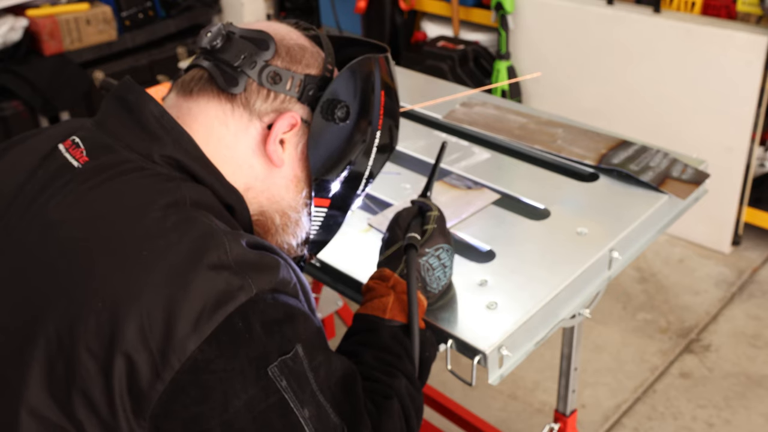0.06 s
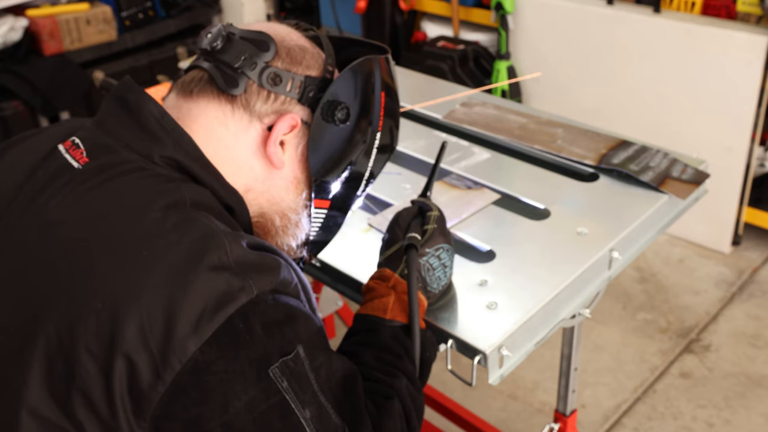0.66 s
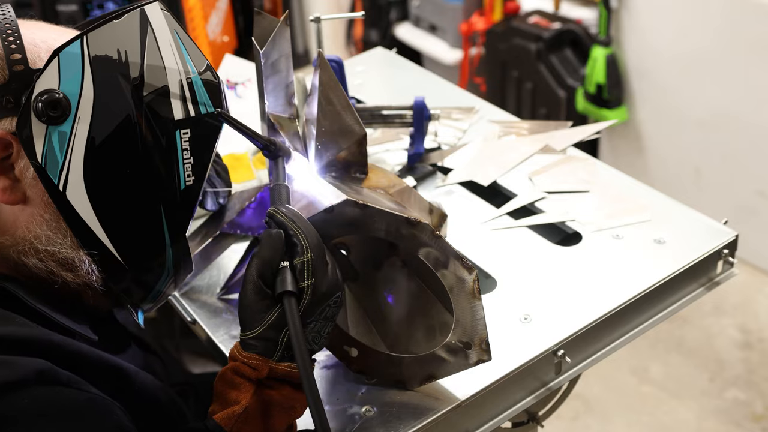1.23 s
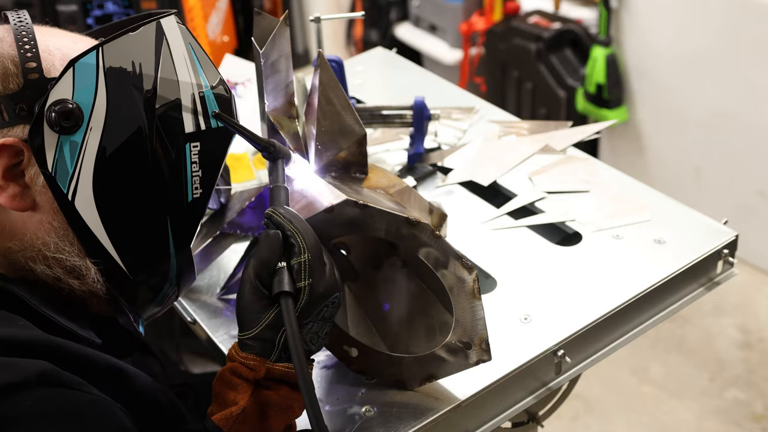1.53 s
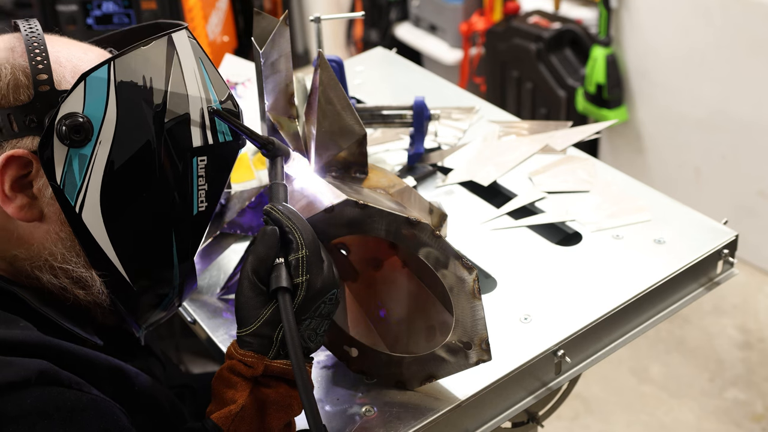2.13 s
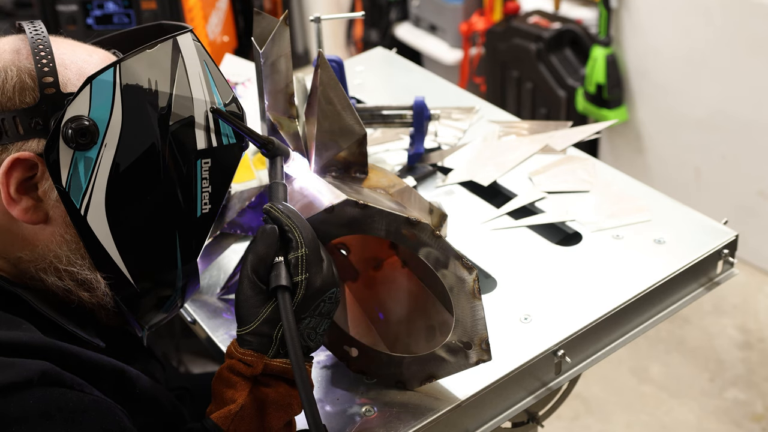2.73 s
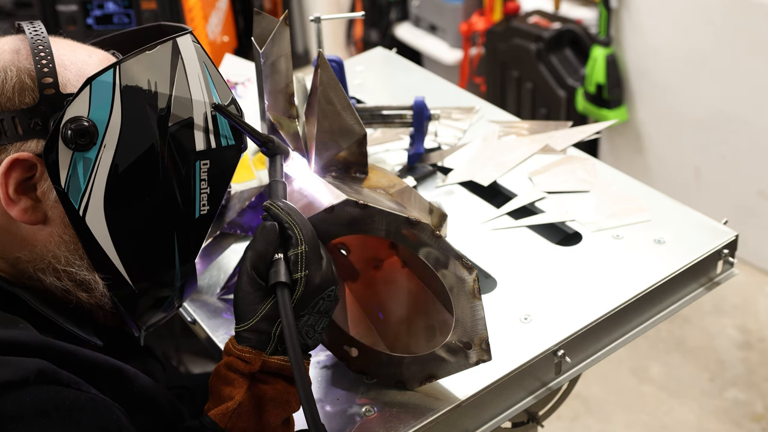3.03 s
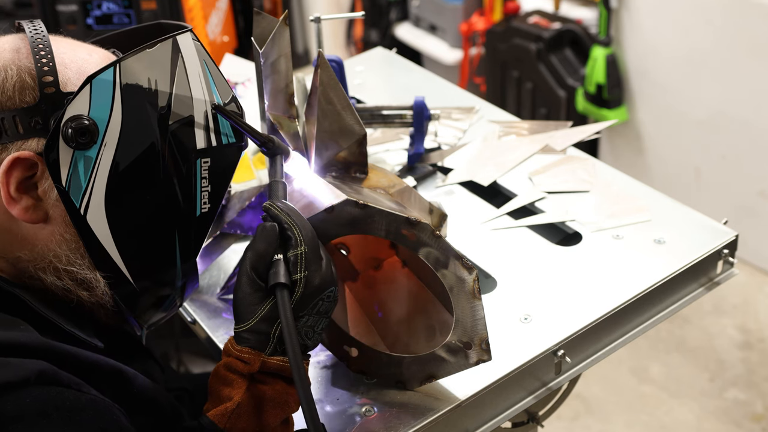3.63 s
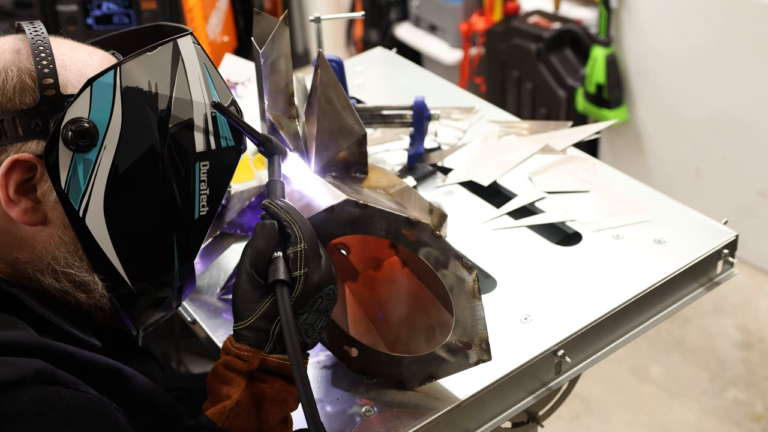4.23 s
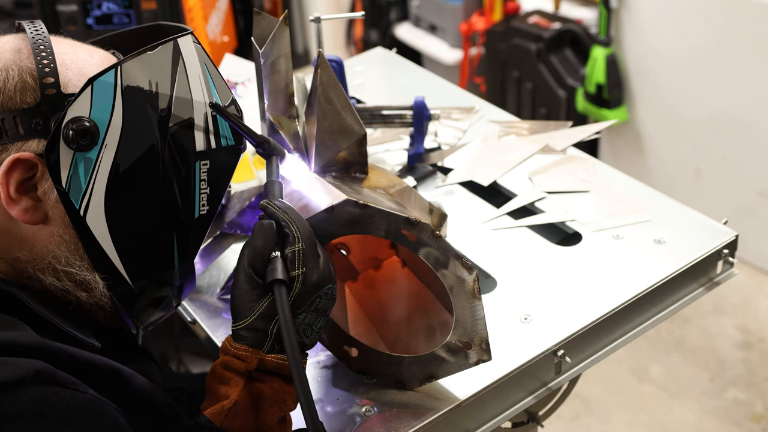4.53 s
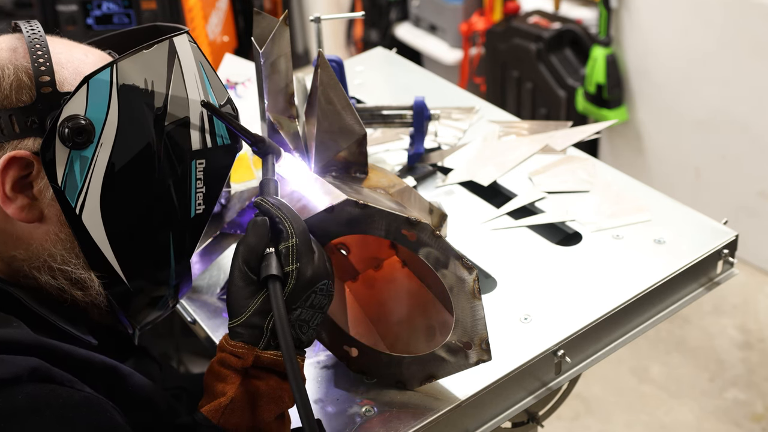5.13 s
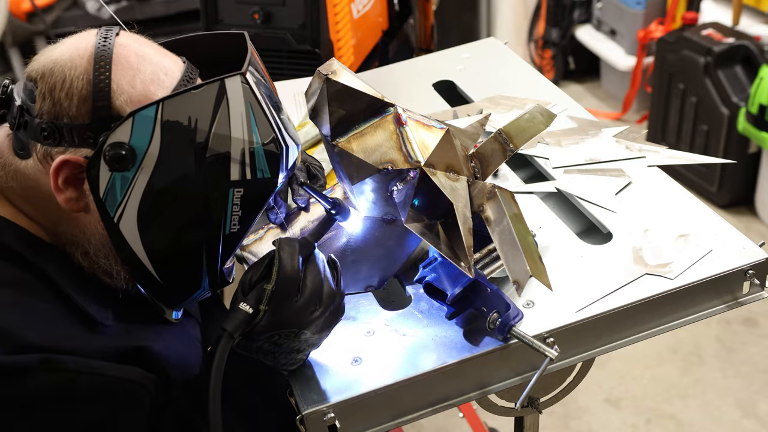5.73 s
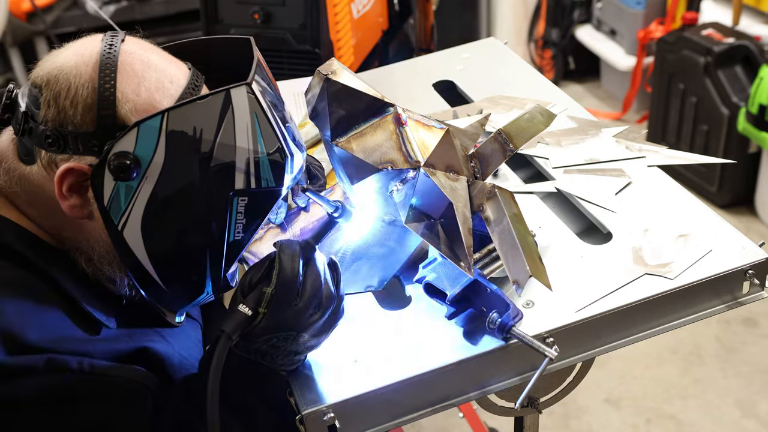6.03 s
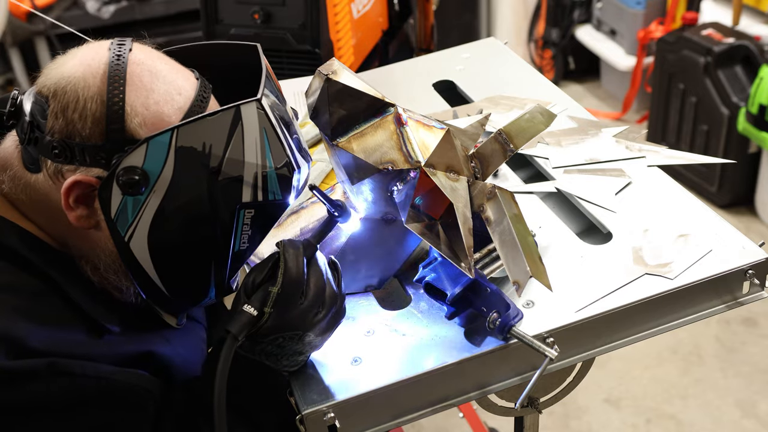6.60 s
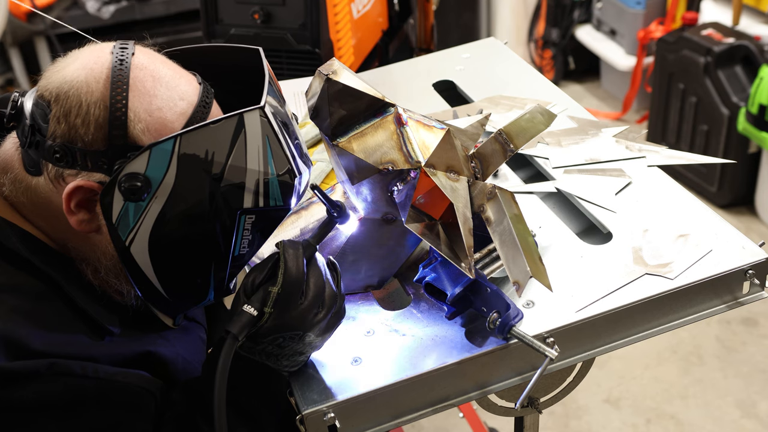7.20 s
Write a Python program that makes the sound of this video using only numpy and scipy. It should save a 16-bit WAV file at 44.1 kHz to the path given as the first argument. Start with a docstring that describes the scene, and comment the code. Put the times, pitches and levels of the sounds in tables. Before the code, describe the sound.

Heard close on one microphone in a workshop, a welder hums and its arc softly flutters. Two sharp electrical pops overload the input. The first brings a buzzing arc, tiny scratchy squeaks from the heated metal and a fan that climbs to a steady whine and hiss. The second ends the buzz, leaving the fan running with a few faint stutters from the welder's coil. Soft, dull glove bumps come occasionally.

```python
"""A TIG welding arc at a steel bench, heard close up on one microphone, with the welder running beside it. The
sound falls into three stretches, and each change of scene comes with a loud pop that overloads the input. First
the arc flutters softly; then its alternating current makes it buzz and the hot metal squeaks, while the cooling
fan spins up to a whine and a rush of air; last the arc is quiet under the fan and the coil stutters. Gloved
hands bump the work now and then."""
import sys
import numpy as np
from scipy import signal
from scipy.io import wavfile
from scipy.ndimage import uniform_filter1d

SR = 44100
rng = np.random.default_rng(int(sys.argv[2]) if len(sys.argv) > 2 else 0)


def int16_out(signal):
    """Quantize to a 16-bit WAV file."""
    q = np.round(np.clip(np.atleast_2d(signal).T, -1, 1) * 32767)
    wavfile.write(sys.argv[1], SR, q.astype(np.int16))


N = 328986
T = np.arange(N) / SR

# broad colour of the air noise in each stretch: frequency_hz, relative_db
SOFT_AIR = [(25, -23), (55, -12), (110, -10.5), (260, -2), (600, -9.5), (1300, -10), (2300, -16.5),
            (4400, -16.5), (5200, -22), (9000, -23.5), (10000, -28.6), (13500, -31), (15600, -40.3)]
BUZZ_AIR = [(25, -31.9), (55, -36), (100, -23), (190, -24), (300, -16.5), (600, -4.5), (1100, -21),
            (2200, -5), (4000, 0.0), (8000, -4.5), (12000, -4), (15600, -8.5)]
QUIET_AIR = [(25, -37), (55, -40.1), (100, -26), (190, -30.5), (300, -16.5), (600, -11), (1100, -17),
             (2200, -1.5), (4000, 1.5), (8000, -6), (12000, -7), (15600, -7.5)]
# resonances of case and bench in each stretch: centre_hz, width_hz, gain_db
SOFT_PEAKS = [(390, 42, 5.5), (510, 29, 7.1), (597, 41, 7.7), (674, 30, 7), (842, 36, 6.3),
              (2670, 208, 3.0)]
BUZZ_PEAKS = [(398, 140, 7.5), (480, 240, -9.5), (578, 32, 7), (859, 93, 4.5), (1008, 270, 8.5),
              (1178, 52, 9), (1307, 204, 13.5), (1613, 260, 13), (1900, 52, 2), (2028, 71, 10),
              (2358, 390, 9.5), (2910, 45, 4.5), (2950, 510, -3), (3470, 52, 6), (3815, 260, -3.5),
              (3900, 75, 7.5), (4580, 73, -6), (5450, 270, -2), (5770, 280, 3), (5820, 119, -7),
              (6813, 110, -1), (8100, 370, 7), (8500, 159, -4.4), (8700, 102, 0), (9400, 350, 3),
              (10230, 325, 2), (11100, 82, -6), (12443, 278, 1.5)]
QUIET_PEAKS = [(493, 69, -6), (930, 180, 5), (1223, 115, 12.5), (1434, 99, 7.5), (1636, 89, 8),
               (1920, 53, -11), (2000, 76, 5.5), (2380, 290, 7.5), (2793, 410, -8), (2840, 120, 5),
               (3190, 200, -5.5), (3456, 73, 8), (3840, 262, -6), (3910, 87, 8), (4700, 87, -5),
               (4862, 126, 4.5), (5410, 170, 4), (6350, 190, -9.5), (6555, 460, 4), (7330, 290, 3),
               (7920, 380, 5), (8400, 133, 6), (9300, 187, 3.5), (10120, 90, 7), (10900, 46, 5.0),
               (12670, 366, 2)]
# growth of the rush with fan speed: frequency_hz, gain_db_per_doubling
RUSH_GROWTH = [(100, -3), (500, 1), (1200, -3), (2200, 5.5), (4500, 13), (9000, 11.5), (15000, 5.5)]
# the welder's hum and whines in each stretch: pitch_hz, level_db, wander_hz
SOFT_HUM = [(59.4, -59.5, 2), (254.4, -45.5, 8.3), (374, -55, 7.1), (500, -54, 7), (1256, -56.5, 1.2)]
BUZZ_HUM = [(107, -74, 2), (241, -66, 1), (397, -62, 2), (427, -63, 3), (554.5, -51.5, .7), (581, -58, 2),
            (721, -60, 1), (868, -56.5, 1), (1146, -60, 1), (1182, -59, 2), (1303, -57, 2),
            (2400.5, -44.5, .6), (2833, -59, 1), (3603, -54.5, 3), (5050, -55, 5), (10092, -53, 4),
            (10800, -61, 8)]
QUIET_HUM = [(241, -67, 1), (490, -59, 2), (721.4, -59, 1), (871, -57, 1), (1200, -58, 2),
             (2400.5, -46, .6), (2833, -58, 1), (4430, -54, 2), (9367, -57, 4), (10094, -55, 6),
             (10336, -60, 4), (10804, -60, 6)]
# stutters of the coil: centre_s, base_level_db
STUTTERS = [(5.738, -44), (5.808, -43.5), (5.876, -44), (5.958, -42.5)]
# the two tones in each stutter: pitch_hz, relative_db
COIL_TONES = [(500, -2.5), (605, 1.5)]
# the fan's blade tone, before speed and duct act on it: time_s, base_level_db
BLADE_LEVEL = [(2.1, -40.5), (2.14, -42.5), (2.49, -34.5), (2.59, -40), (2.65, -34.5), (3.71, -45),
               (3.76, -39), (5.4, -41.5), (6.06, -36), (6.67, -42.5), (7.32, -39.5), (7.46, -41)]
# resonances of the fan's duct: centre_hz, width_hz, gain_db
DUCT_PEAKS = [(1399, 48, 16), (1650, 130, 5.8), (2050, 140, 13), (2275, 140, 6.6)]
# the fan's other tones at full speed: blade_tone_multiple, level_db
BUZZ_FAN_TONES = [(.2, -68), (.8, -50.5), (2, -42), (3, -52), (4, -63), (5, -50)]
QUIET_FAN_TONES = [(.2, -70), (.8, -50), (2, -45), (3, -51.5), (4, -50), (5, -54)]
# groans of the accelerating motor: blade_tone_multiple, centre_s, half_length_s, level_db
GROANS = [(0.801, 1.81, 0.041, -43), (1.6, 1.84, .045, -42)]
# gloved hands on the work: centre_s, pitch_hz, level_db
BUMPS = [(1.40, 295, -45), (2.16, 350, -45), (2.33, 350, -47.5), (2.79, 327, -46), (3.23, 355, -49),
         (4.54, 310, -54), (5.888, 432, -54)]
# loud pops where the scene changes: start_s, dip_s, surge_s, unfiltered_fizz_db
POPS = [(1.19598, .00017, .00082, -20), (5.59736, .00016, .00083, -28)]
# where the buzzing and the quiet stretch begin: start_s
STRETCH_STARTS = [1.19598, 5.59734]
# loudest squeaks of the hot metal: centre_s, pitch_hz, slide_hz_per_s, level_db
SQUEAKS = [(1.294, 6050, 35000, -42), (1.31, 7940, -15000, -41), (1.325, 5270, -20000, -39),
           (1.345, 2640, 0, -41), (1.506, 6370, -15000, -43), (1.538, 9600, 5000, -38),
           (1.553, 6540, 4999, -42), (1.577, 6730, 5000, -40), (1.605, 10000, 15000, -39),
           (1.685, 6760, -20000, -41), (1.74, 6200, 15000, -39), (2.88, 6100, 0, -39), (5.44, 6250, 0, -39)]
# harmonics of the arc at its mean pitch: harmonic_number, level_db
ARC_HARMONICS = [(1, -46), (2, -46), (3, -50), (4, -54.5), (5, -77), (6, -67), (7, -61)]

IDLE_HZ, FULL_HZ, QUIET_FAN_HZ = 1412, 2477.5, 2461  # blade tone: idling, spun up, in the quiet stretch
SPIN_UP_S, SPIN_HZ_PER_S, EASE_S = 1.505, 2020, .14


def gain_of(db):
    """Decibels to a factor."""
    return 10 ** (np.asarray(db) / 20)


def unit_rms(x):
    """Scales to rms 1."""
    return x / np.sqrt(np.mean(x ** 2) + 1e-20)


def spectrum_at(points, hz):
    """Reads a spectrum on a log-frequency axis."""
    frequencies, values = np.transpose(points)
    return np.interp(np.log(hz + 1), np.log(frequencies + 1), values)


def resonances(peaks, hz):
    """The dB that bell-shaped resonances add at hz."""
    return sum(db * 2 ** -np.minimum((2 * (hz - centre) / width) ** 2, 50) for centre, width, db in peaks)


def highpass(x, hz, order):
    """Rolls off what lies under hz."""
    return signal.sosfilt(signal.butter(order, hz, "highpass", fs=SR, output="sos"), x)


def drift(rate):
    """A random wander of rms 1 that changes about rate times a second."""
    t = np.linspace(0, T[-1], max(1500, int(rate * T[-1] * 4)))
    hz = rate * np.geomspace(1 / 8, 1, 16)[:, None]
    sines = np.sin(2 * np.pi * (hz * t + rng.random(hz.shape)))
    return np.interp(T, t, unit_rms(sines.sum(0)))


def tone(hz):
    """A sine of rms 1 on a steady pitch or a pitch curve."""
    cycles = np.cumsum(np.broadcast_to(hz, N)) / SR
    return np.sqrt(2) * np.sin(2 * np.pi * (cycles + rng.random()))


def swell(centre_s, half_length_s):
    """A smooth, bell-shaped envelope."""
    return np.exp(-np.minimum(((T - centre_s) / half_length_s) ** 2, 50))


def air_rush(shape, peaks, level_db, ripple_db, eddy_db, flicker_db, blade_hz=None):
    """Turbulent air through case and bench resonances; a climbing fan brightens it and swells it to level."""
    size, hop = 2048, 512
    frames, hz = N // hop + 5, np.fft.rfftfreq(size, 1 / SR)
    real, imaginary, eddies = rng.standard_normal((3, frames, len(hz)))
    ringing_db = resonances(peaks, hz)
    # reflections from the bench comb the treble with a fine ripple
    ripple = unit_rms(uniform_filter1d(rng.standard_normal(len(hz)), size=5))
    colour = gain_of(spectrum_at(shape, hz) + ringing_db + ripple_db * ripple * hz / (hz + 2000))
    # eddies come and go in patches, and the whole flow can flicker
    eddies = unit_rms(uniform_filter1d(uniform_filter1d(eddies, size=6, axis=0), size=24, axis=1))
    flicker = unit_rms(uniform_filter1d(rng.standard_normal(frames), size=8))[:, None]
    spectra = (real + 1j * imaginary) * colour * gain_of(eddy_db * eddies + flicker_db * flicker)
    full_speed_rms = np.std(signal.istft(spectra.T, nperseg=size, noverlap=size - hop)[1])
    if blade_hz is not None:
        speed = np.interp(np.arange(frames) * hop / SR, T, blade_hz) / blade_hz[-1]
        # a slow fan hardly stirs the high resonances, so the hiss starts out smoother
        growth_db = spectrum_at(RUSH_GROWTH, hz) + 1.3 * ringing_db * hz / (hz + 3000)
        spectra *= gain_of(np.log2(speed)[:, None] * growth_db)
    rush = signal.istft(spectra.T, nperseg=size, noverlap=size - hop)[1][:N]
    return gain_of(level_db) / full_speed_rms * rush


def welder_hum(tones, drift_per_s, waver_db):
    """The welder's steady hum and whines, wavering a little in pitch and strength."""
    return sum(gain_of(db + waver_db * drift(drift_per_s)) * tone(hz + wander_hz * drift(drift_per_s))
               for hz, db, wander_hz in tones)


def welder_coil(hold_start_s=6.04, hold_hz=554.0, hold_db=-52):
    """The coil stutters in four short buzzes, then holds one note."""
    stutter = sum(gain_of(db) * swell(s, half_length_s=.0091) for s, db in STUTTERS)
    buzz = sum(gain_of(db) * tone(hz) for hz, db in COIL_TONES)
    held = np.clip((T - hold_start_s) / .02, 0, 1) * tone(hold_hz)
    return stutter * buzz + gain_of(hold_db) * held


def fan_spin_up():
    """The blade tone in Hz: idle, a steady climb with rounded corners, then full speed."""
    climb = np.clip(IDLE_HZ + SPIN_HZ_PER_S * (T - SPIN_UP_S), IDLE_HZ, FULL_HZ)
    return uniform_filter1d(climb, size=round(EASE_S * SR))


def fan_groan(blade_hz):
    """Side tones that rise with the fan while its motor pulls hardest."""
    return sum(gain_of(db) * swell(s, half_length_s) * tone(multiple * blade_hz)
               for multiple, s, half_length_s, db in GROANS)


def fan_whine(blade_hz, other_tones, blade_db_per_octave=25, others_db_per_octave=190):
    """The blades sing louder with speed and at duct resonances; their other tones need full speed."""
    octaves = np.log2(blade_hz / blade_hz[-1])
    climbing = np.gradient(blade_hz) * SR / SPIN_HZ_PER_S
    # uneven inflow shakes the tones, most while the fan climbs
    hz = blade_hz * (1 + .0004 * drift(14) + .012 * climbing * drift(120))
    base_db = np.interp(T, *np.transpose(BLADE_LEVEL))
    level_db = base_db + blade_db_per_octave * octaves + resonances(DUCT_PEAKS, blade_hz)
    blade = gain_of(level_db + 1.47 * drift(9)) * tone(hz)
    others = sum(gain_of(db + .9 * drift(14)) * tone(multiple * hz) for multiple, db in other_tones)
    return blade + others * gain_of(others_db_per_octave * octaves)


def glove_bumps():
    """Gloved hands knock the work: dull, padded bumps of a few cycles each."""
    return sum(gain_of(db) * swell(s, half_length_s=.014) * tone(hz) for s, hz, db in BUMPS)


def scene_change_pops(drive_db=7, collapse_s=.00041, fizz_decay_s=.003, coupling_hz=190, ceiling=1.25):
    """At each change of scene a short dip, a surge and a collapse pass the input's coupling and overload it: a
    dry, fizzy snap."""
    dip, surge, fizz = np.zeros((3, N))
    for start_s, dip_s, surge_s, fizz_db in POPS:
        age_s = T - start_s - dip_s
        dip -= (T >= start_s) & (age_s < 0)
        surge += gain_of(drive_db) * (age_s >= 0) * np.exp(-np.maximum(age_s - surge_s, 0) / collapse_s)
        fizz += gain_of(fizz_db) * (age_s >= 0) * np.exp(-np.maximum(age_s, 0) / fizz_decay_s)
    snap = np.clip(dip + highpass(surge, coupling_hz, order=1), -ceiling, ceiling)
    hiss = highpass(rng.standard_normal(N), hz=8000, order=2)
    return highpass(snap, hz=40, order=1) + fizz * hiss


def metal_squeaks(heating_s=(1.1, 1.78), faint_hz=(4570, 12100), faint_db=-49, faint_count=8):
    """Brief, scratchy whistles from the weld pool; fainter ones come at random while the metal heats."""
    faint = [(rng.uniform(*heating_s), rng.uniform(*faint_hz), 0, faint_db) for _ in range(faint_count)]
    bend = 1 + .012 * drift(60) + .04 * drift(1500)  # wobble and rasp
    return sum(gain_of(db) * swell(s, half_length_s=.011) * tone((hz + slide * (T - s)) * bend)
               for s, hz, slide, db in SQUEAKS + faint)


def arc_buzz(current_hz=339.5, start_sharp_hz=16, settle_s=.05, db_per_hz=.36):
    """Each reversal of the current pushes the air around the arc: a wavering stack of harmonics."""
    wander_hz = 2.0 * drift(6)
    settling_hz = start_sharp_hz * np.exp(-np.maximum(T - STRETCH_STARTS[0], 0) / settle_s)
    hz = (current_hz + wander_hz + settling_hz) * (1 + .0022 * drift(20))
    buzz = sum(gain_of(db) * tone(harmonic * hz) for harmonic, db in ARC_HARMONICS)
    return gain_of(db_per_hz * wander_hz) * buzz  # weaker as the pitch sags


def scene():
    """The soft, buzzing and quiet stretches in turn; one microphone at the bench feeds both channels."""
    soft = air_rush(SOFT_AIR, SOFT_PEAKS, level_db=-40.5, ripple_db=2.5, eddy_db=.75, flicker_db=.5)
    soft += welder_hum(SOFT_HUM, drift_per_s=28, waver_db=3.0)

    blade_hz = fan_spin_up()
    buzzing = air_rush(BUZZ_AIR, BUZZ_PEAKS, level_db=-30, ripple_db=1.5, eddy_db=.83, flicker_db=0,
                       blade_hz=blade_hz)
    buzzing += fan_whine(blade_hz, BUZZ_FAN_TONES) + fan_groan(blade_hz)
    buzzing += welder_hum(BUZZ_HUM, drift_per_s=6, waver_db=.4)
    buzzing += arc_buzz() + metal_squeaks()

    quiet = air_rush(QUIET_AIR, QUIET_PEAKS, level_db=-30, ripple_db=.7, eddy_db=1.07, flicker_db=.14)
    quiet += fan_whine(np.full(N, QUIET_FAN_HZ), QUIET_FAN_TONES)
    quiet += welder_hum(QUIET_HUM, drift_per_s=6.6, waver_db=.4) + welder_coil()

    welding = np.select([T < STRETCH_STARTS[0], T < STRETCH_STARTS[1]], [soft, buzzing], quiet)
    mono = welding + glove_bumps() + scene_change_pops()
    return np.array([mono, mono])


def record(dry):
    """The microphone's input clips on the pops, then loses the highest treble."""
    clipped = np.clip(dry, -1, 1)
    lowpass = signal.firwin(2047, cutoff=15760, window=("kaiser", 9), fs=SR)
    return signal.oaconvolve(clipped, lowpass[None], "same")


dry = scene()
out = record(dry)
int16_out(out)
```